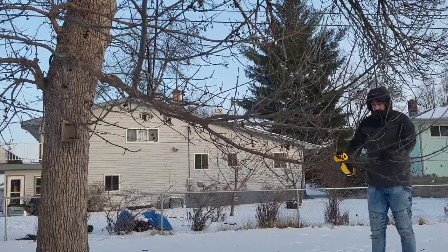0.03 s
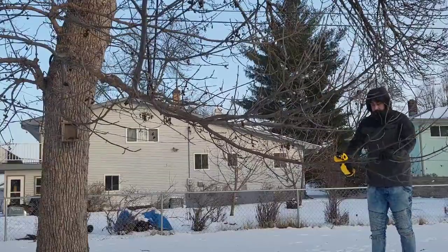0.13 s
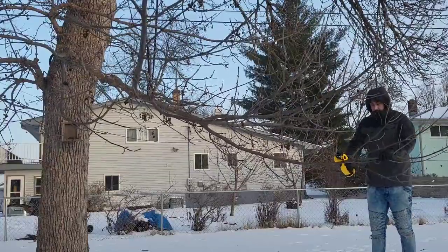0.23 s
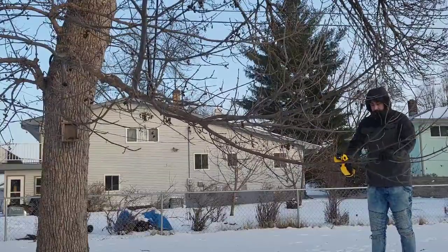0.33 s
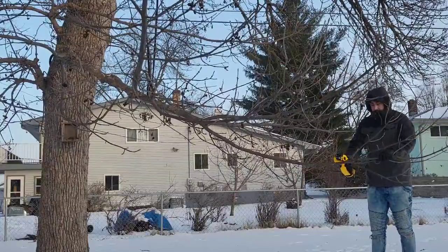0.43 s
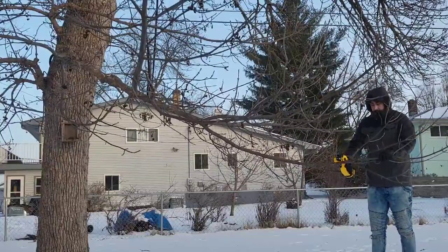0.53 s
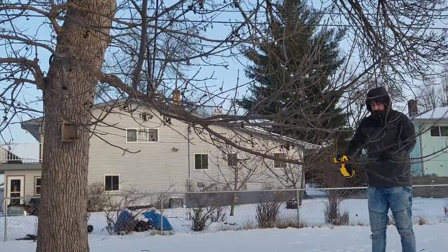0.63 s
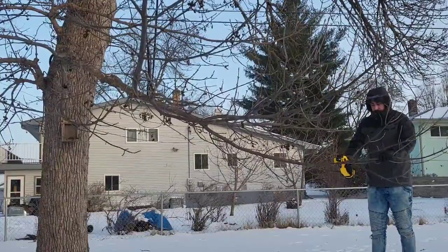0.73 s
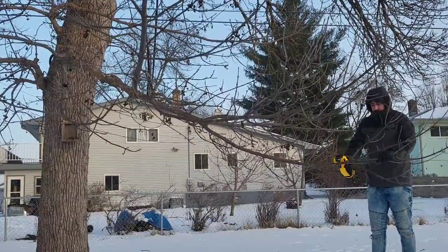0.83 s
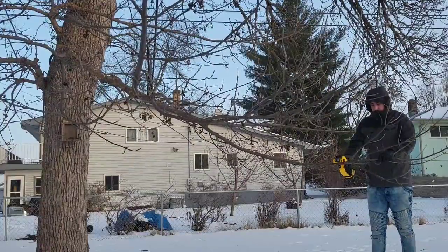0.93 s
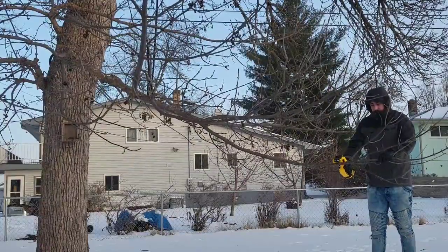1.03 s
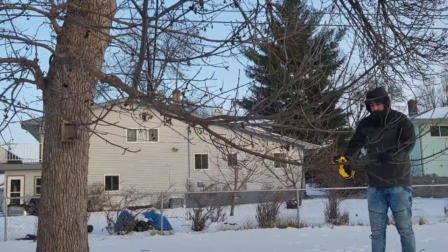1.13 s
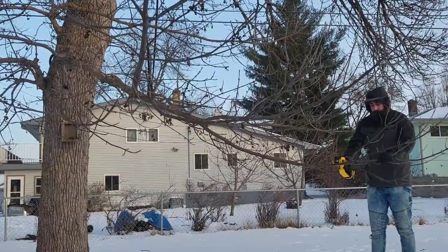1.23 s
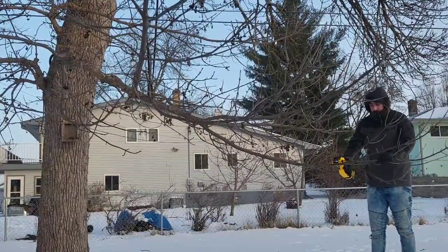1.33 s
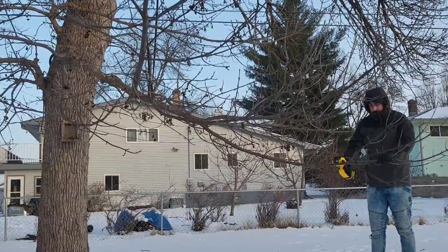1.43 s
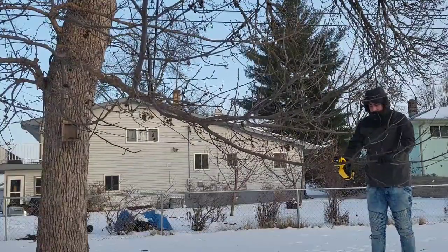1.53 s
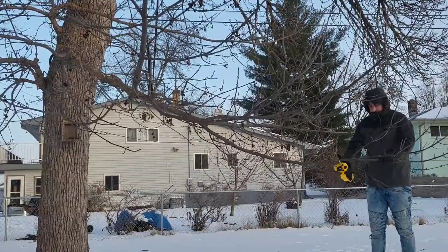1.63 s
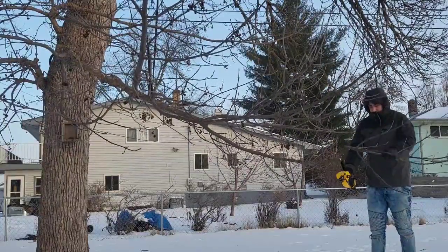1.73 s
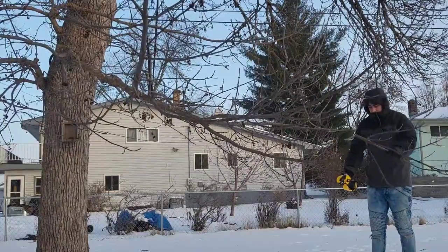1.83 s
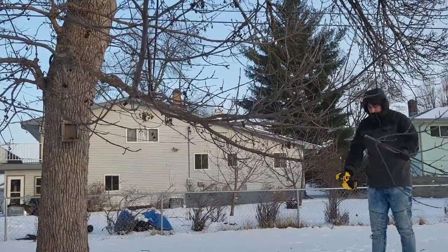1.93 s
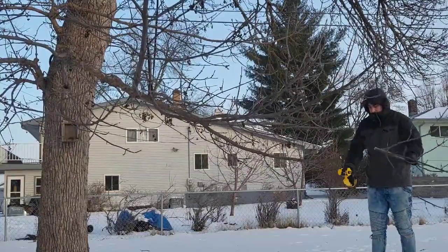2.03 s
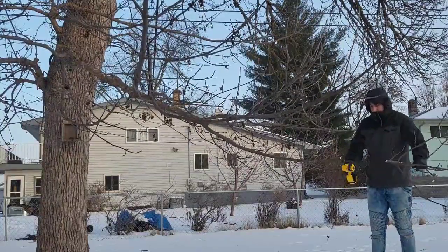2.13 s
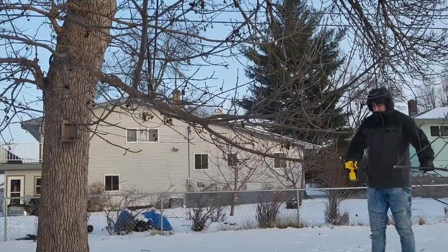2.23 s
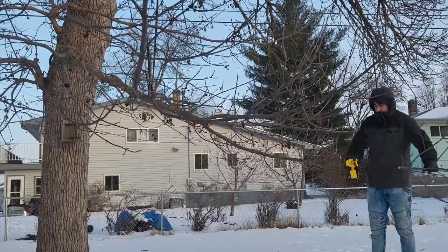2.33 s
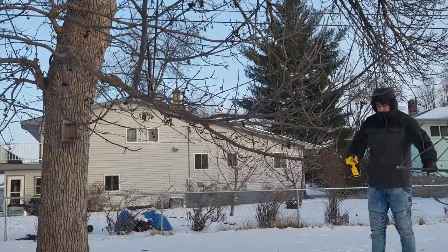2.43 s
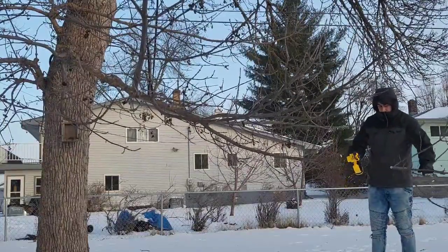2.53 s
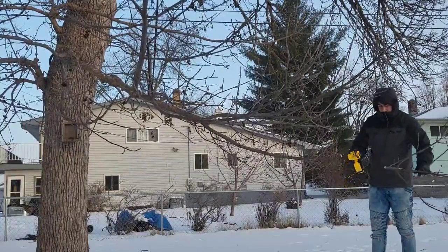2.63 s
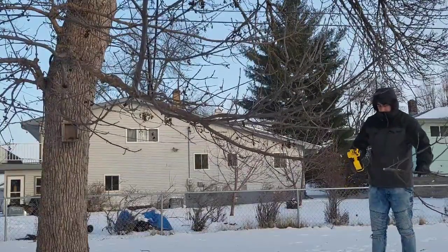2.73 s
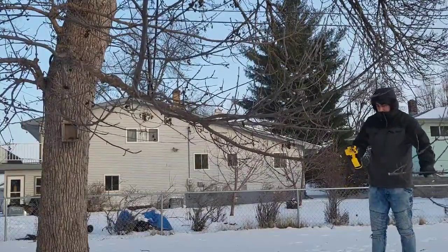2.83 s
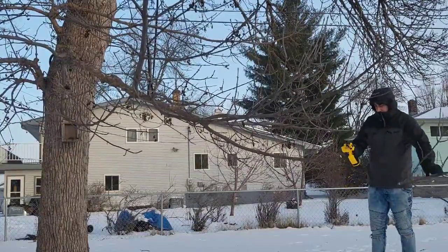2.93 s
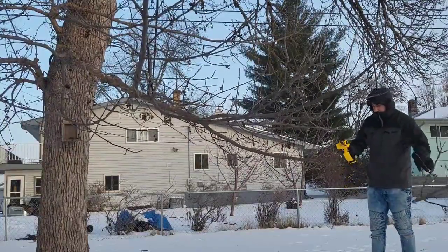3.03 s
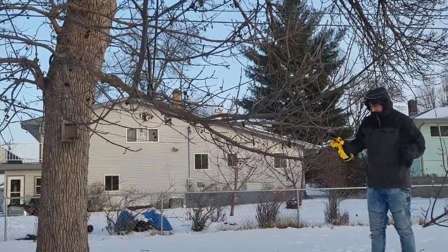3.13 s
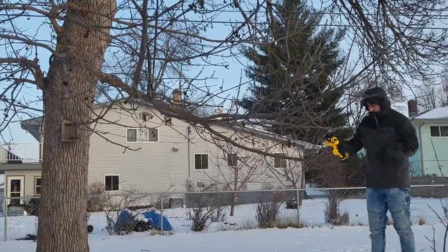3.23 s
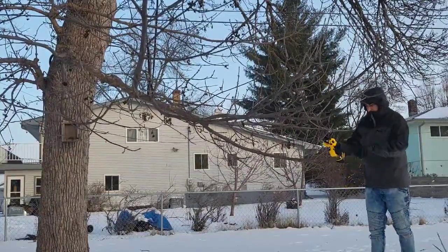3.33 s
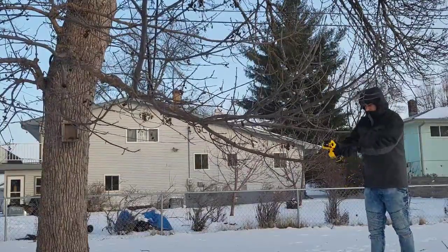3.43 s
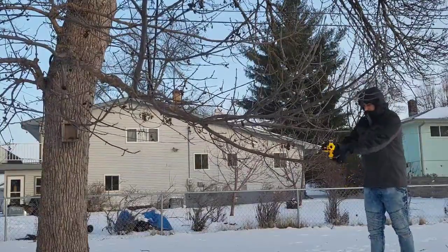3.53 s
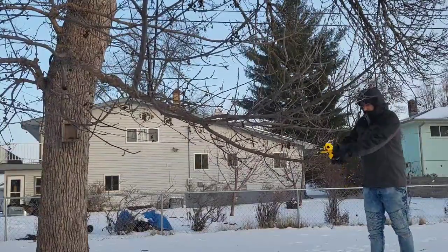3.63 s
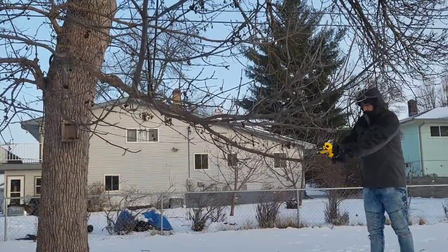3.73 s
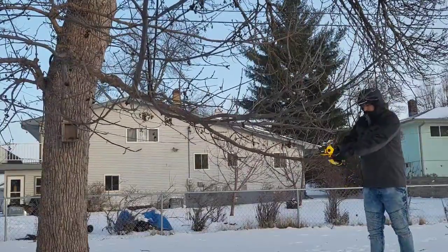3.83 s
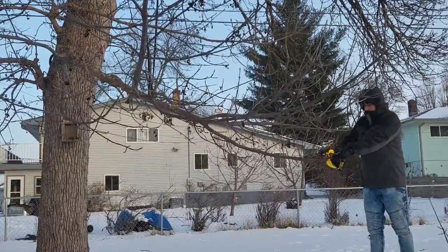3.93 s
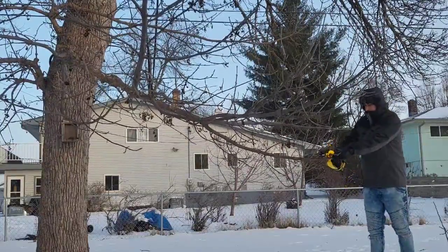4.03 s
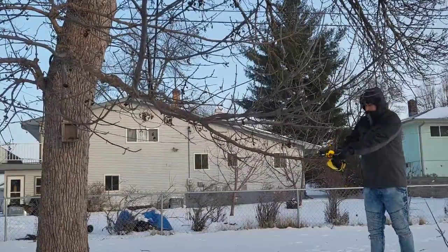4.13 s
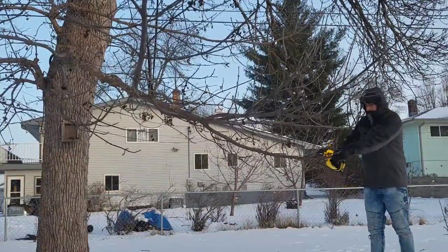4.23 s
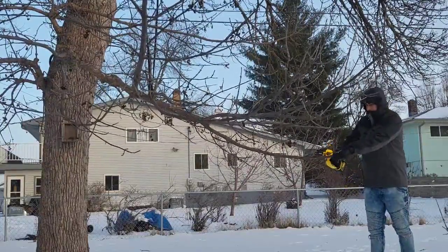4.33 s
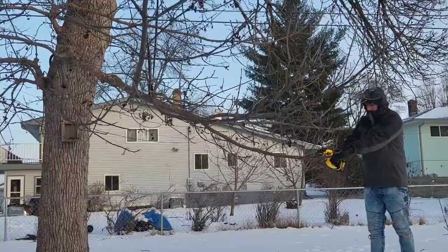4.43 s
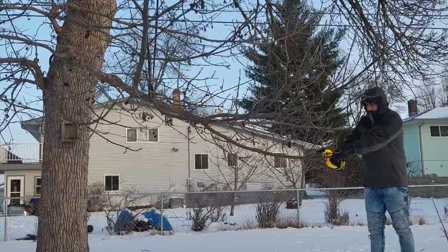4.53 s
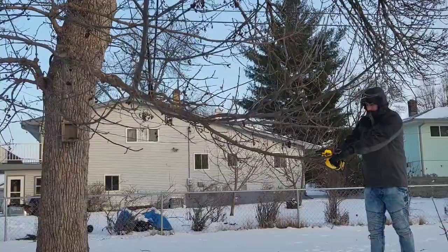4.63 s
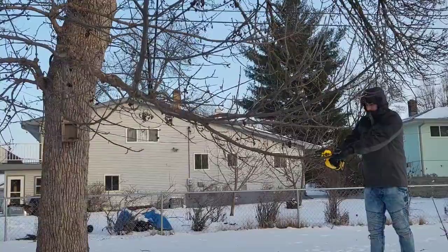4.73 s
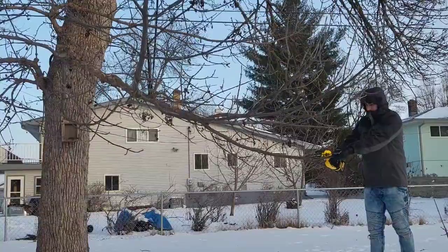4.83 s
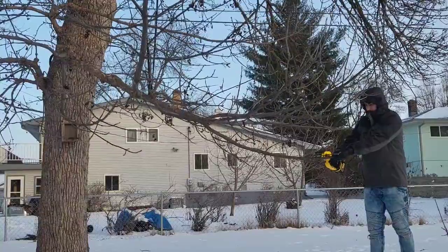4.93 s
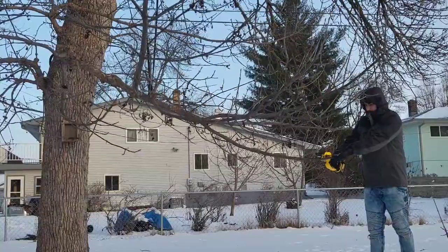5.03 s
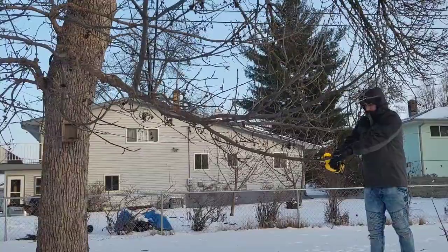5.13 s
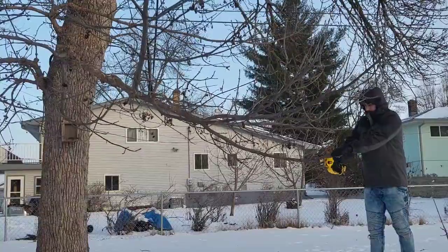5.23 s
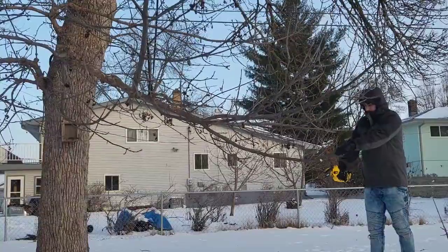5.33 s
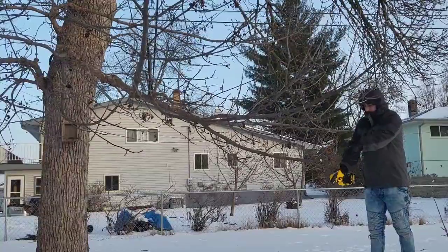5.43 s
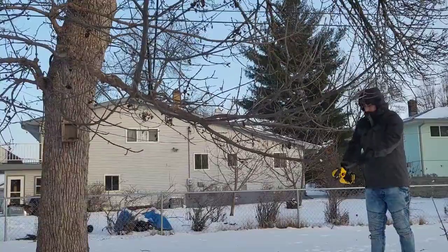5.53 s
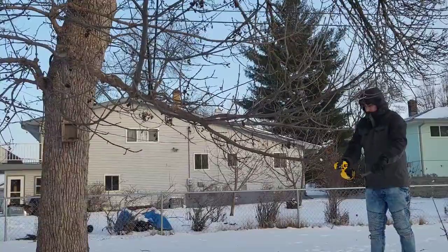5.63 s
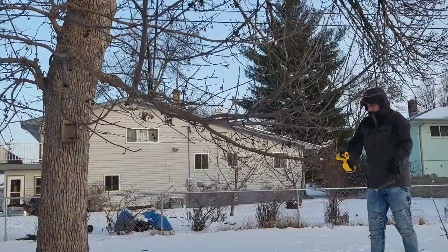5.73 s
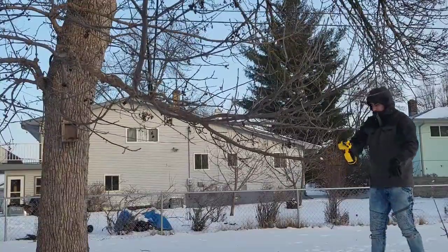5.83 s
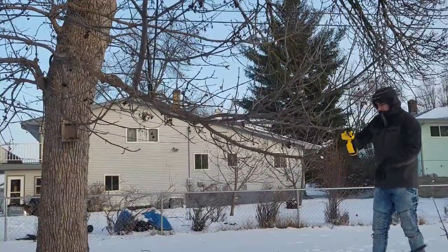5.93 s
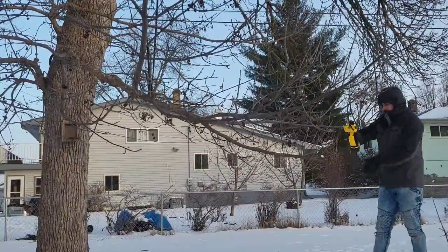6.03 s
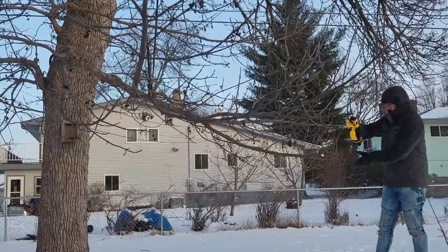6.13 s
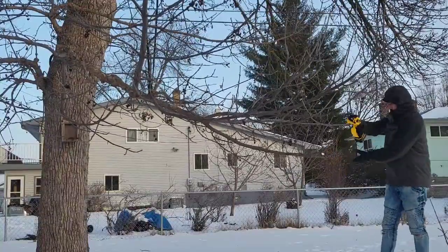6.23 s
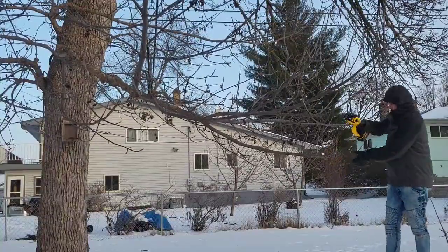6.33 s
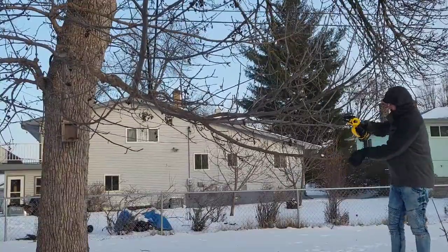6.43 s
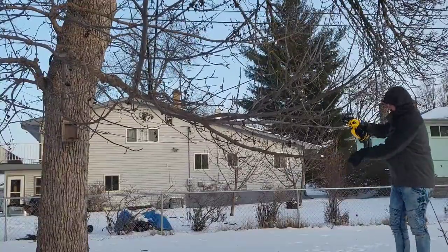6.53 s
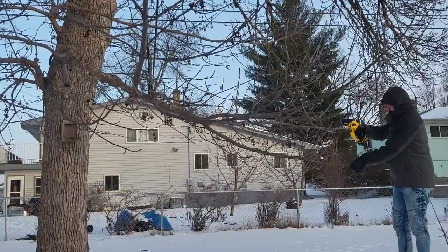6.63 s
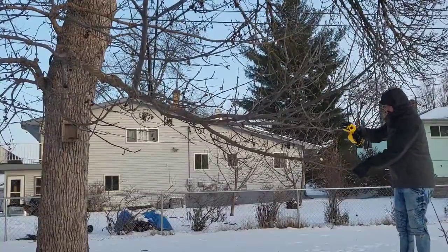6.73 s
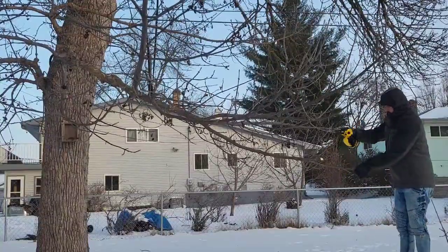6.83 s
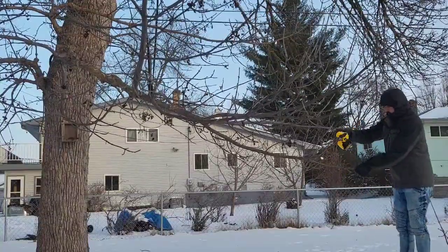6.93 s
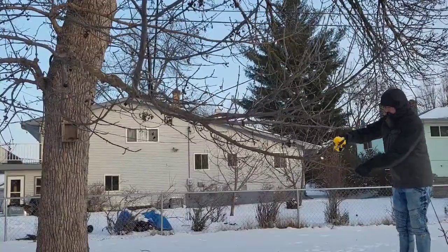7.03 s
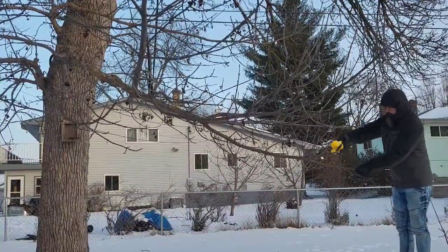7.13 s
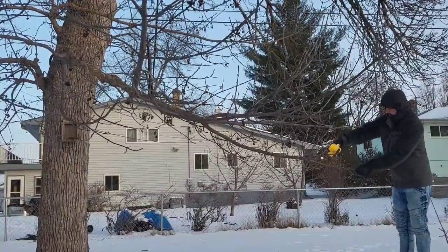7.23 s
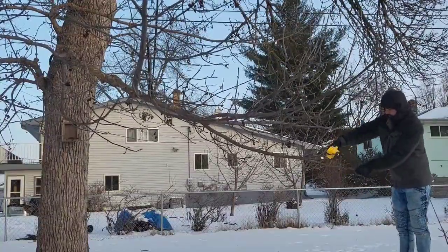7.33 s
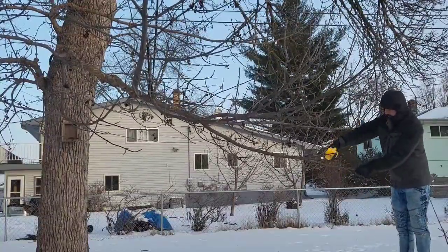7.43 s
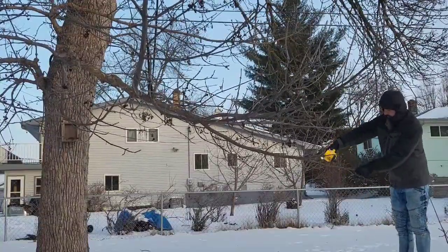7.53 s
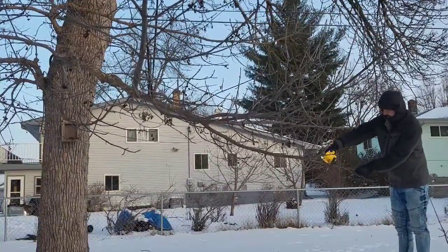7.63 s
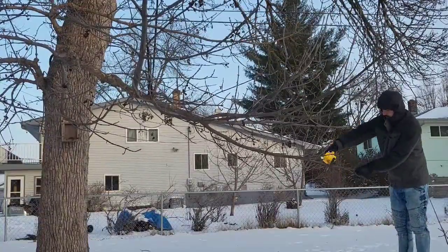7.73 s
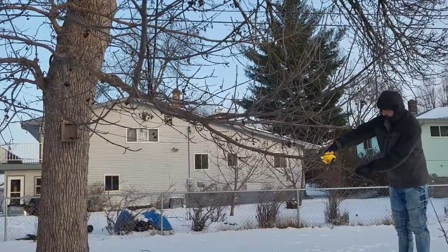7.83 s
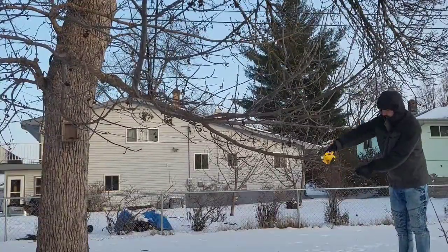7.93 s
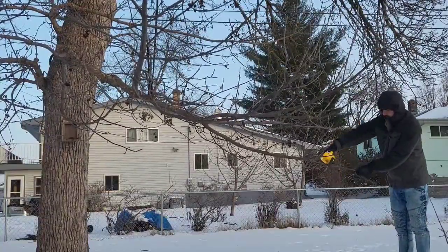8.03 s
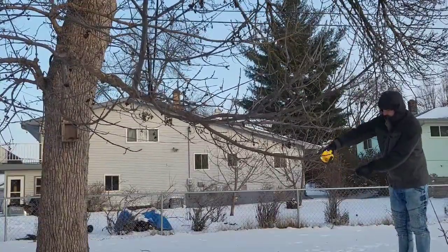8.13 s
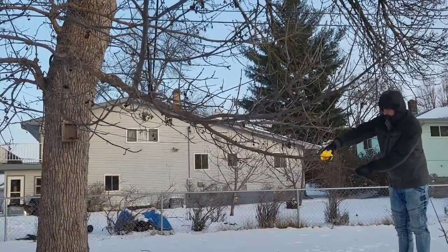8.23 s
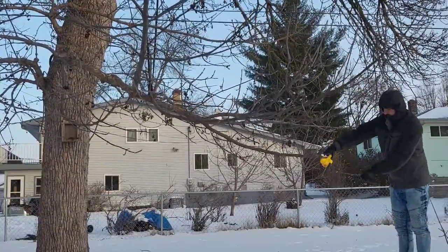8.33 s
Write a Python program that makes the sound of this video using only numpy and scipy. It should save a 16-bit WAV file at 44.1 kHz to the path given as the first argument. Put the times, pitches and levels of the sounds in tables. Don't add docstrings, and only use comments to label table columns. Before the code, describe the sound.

Outdoors, a small battery chainsaw works to the left of a stereo microphone. It is already spinning up at 0 s, a dry buzzing chain rattle with a faint motor hum. From about 0.6 s it catches wood, and from 0.9 to 1.6 s it snarls roughly with branch knocks, steel ringing, chip spray and hard cracks, the loudest near 1.5 s. It runs free and cuts off at 1.9 s. In the gap, cloth and snow rustle, twigs snap around 3 s, and low gusts thump near 2.8, 3.1 and 4.1 s. A short squeak and quickening link ticks start the second run at 4.2 s; it chatters through wood from 4.5 to 5.3 s and stops near 5.5 s. Rustles, a sharp snap at 6.1 s and wind buffets follow. The third run starts at 7.4 s, bites from 7.7 s, moans and squeals briefly around 8.2 s, and continues to the end. Faint town hum and hiss persist.

```python
import sys
import numpy as np
from scipy import signal
from scipy.fft import rfft, irfft, next_fast_len
from scipy.io import wavfile
from scipy.ndimage import uniform_filter1d

SR = 44100
rng = np.random.default_rng(int(sys.argv[2]) if len(sys.argv) > 2 else 0)


def rack_gain(trim_db):
    fader = np.asarray(trim_db, float)
    return 10 ** (fader / 20)


def dump(signal):
    limited = np.clip(np.atleast_2d(signal).T, -1, 1)
    pcm = np.round(limited * 32767).astype(np.int16)
    wavfile.write(sys.argv[1], SR, pcm)


N = 369116

# pulled [t/s], up to speed [t/s], released [t/s],
# chain rattle running free [level/dB], motor hum running free [level/dB]
RUNS = [
    (-.14, 0.202, 1.936, -42.5, -51),
    (4.16, 4.369, 5.465, -44, -55),
    (7.397, 7.689, 8.6, -46, -67),
]


def evened(x):
    return x / np.sqrt(np.mean(x ** 2) + 1e-20)


def smooth_noise(samples, length):
    return evened(uniform_filter1d(rng.standard_normal(length), samples))


def read(points, hz):
    f, value = np.transpose(points)
    return np.interp(np.log(hz + 1), np.log(f + 1), value)


def add(mix, s, sound):
    part = mix[..., round(s * SR):][..., :sound.shape[-1]]
    part += sound[..., :part.shape[-1]]


def bump(s, rise, fall):
    t = np.arange(N) / SR - s
    return np.exp(-(t / np.where(t < 0, rise, fall)) ** 2)


def colour(x, points):
    log_gain = np.log(rack_gain(read(points, abs(np.fft.fftfreq(4096, 1 / SR)))))
    taps = np.fft.ifft(np.exp(np.conj(signal.hilbert(log_gain)))).real[:2048]
    return signal.oaconvolve(x, taps)[:len(x)]


def ring(x, modes):
    out = np.zeros(len(x))
    for hz, width, db in modes:
        r = np.exp(-np.pi * width / SR)
        pole = r * np.exp(2j * np.pi * hz / SR)
        out += 2 * rack_gain(db) * signal.lfilter([1 - r], [1, -pole], x).real
    return out


def clicks(per_s, spread_db):
    size = rack_gain(spread_db * np.minimum(rng.exponential(1, N), 4)) * rng.standard_normal(N)
    return evened(size * (rng.random(N) < per_s / SR))


def band_gain(x, lo_hz, hi_hz):
    hz, z = np.fft.rfftfreq(len(x), 1 / SR), rfft(x)
    power = np.sum(abs(z[(hz > lo_hz) & (hz < hi_hz)]) ** 2)
    return len(x) / np.sqrt(2 * power)


def wobbled(x, delay_s):
    at = np.arange(N)
    return np.interp(at - delay_s * SR, at, x)


def ports(x, likeness):
    # f/Hz, share [0-1]
    same_curve = [(700, .97), (1030, .87), (1380, .96), (1460, .9995), (1620, .9995), (1850, .88),
                  (2700, .96), (3200, .7), (5500, .65), (7500, .3), (11000, .65), (16000, .5)]
    # f/Hz, phase [radians]
    lead_curve = [(0, 0), (400, .8), (1200, 2.65), (1470, 3.1), (1590, 3.2), (2070, 4.68), (2410, 5.8),
                  (2800, 6.3), (5170, 12.05), (7500, 17.1 - np.pi), (22050, 50.3 - np.pi)]
    # f/Hz, level/dB
    shade_curve = [(100, -.5), (690, -2.7), (1030, -1.6), (1300, -2.6), (1460, 0), (2070, .2), (2410, -4.8),
                   (3100, -3), (3700, -7), (6500, -14), (11500, -15.5), (16000, -32)]
    size = next_fast_len(N + 4096)
    hz = np.fft.rfftfreq(size, 1 / SR)
    same = np.clip(likeness * read(same_curve, hz), 0, 1)
    z = signal.stft(x, nperseg=128, noverlap=64)[2]
    random_turn = np.exp(2j * np.pi * rng.random(z.shape[::-1]).T)
    scattered = np.sqrt(2) * signal.istft(z * random_turn, nperseg=128, noverlap=64)[1]
    direct = same * np.exp(-1j * np.interp(hz, *np.transpose(lead_curve))) * rfft(x, size)
    far = direct + np.sqrt(1 - same ** 2) * rfft(scattered[:N], size)
    return np.array([x, irfft(far * rack_gain(read(shade_curve, hz)), size)[:N]])


def sparse_tail(seconds, t60s):
    taps = np.zeros(int(seconds * SR))
    at = np.arange(40, len(taps) - 20, 20)
    taps[at + rng.integers(0, 20, len(at))] = rng.choice([-1., 1.], len(at))
    hz, t, z = signal.stft(taps, SR, nperseg=256)
    fading = rack_gain(-60 * t / read(t60s, hz)[:, None])
    tail = signal.istft(z * fading, SR, nperseg=256)[1]
    return tail / np.linalg.norm(tail)


def yard(x):
    # f/Hz, time to fall by 60 dB [s]
    echo_times = [(300, 1), (2500, 1), (8000, 0.28), (16000, 0.15)]
    tails = [np.pad(sparse_tail(0.89, echo_times), (600, 0)) for port in range(2)]
    return rack_gain(-29) * np.array([signal.oaconvolve(c, tail)[:N] for c, tail in zip(x, tails)])


def background():
    # f/Hz, level/dB
    town_colour = [(30, -7.5), (60, 13.5), (90, -11), (120, 6), (160, -14.5), (220, -14.5), (400, 6),
                   (600, 2), (1000, -2), (1300, -0.5), (1600, -19), (1950, -14), (2500, -43), (4000, -37.5)]
    # f/Hz, level/dB
    hiss_colour = [(1500, 7.5), (4000, -12), (6500, 1.5), (8000, -5.5), (11300, 0.5), (11800, -13.5),
                   (16000, -9)]
    town = rack_gain(-60.5) * evened(colour(rng.standard_normal(N), town_colour))
    fan_hz, fan_db = 1233, -76.5
    fan = rack_gain(fan_db) * np.sin(2 * np.pi * fan_hz * np.arange(N) / SR)
    hiss = [evened(colour(rng.standard_normal(N), hiss_colour)) for port in range(2)]
    hiss_db = -71
    return ports(town, likeness=0.92) + fan + rack_gain([[hiss_db], [hiss_db - 7.5]]) * hiss


def gusts():
    # peak [t/s], level/dB, half width [s], what the near microphone feels more [dB]
    gust_list = [(.24, -59, 0.24, 14), (1.21, -54, 0.084, 4), (1.557, -52, 0.15, -0.5),
                 (2.802, -58.5, 0.091, 26), (2.99, -49.5, 0.044, 14), (3.15, -52.5, 0.087, 24),
                 (4.071, -53, 0.049, 30), (4.4, -51, 0.054, -11), (4.9, -50.5, 0.61, 6),
                 (5.42, -51, 0.027, 14), (5.85, -51, 0.029, -6.5), (6.08, -47, 0.14, 3),
                 (6.28, -43.5, 0.054, 16.5), (6.448, -50.5, 0.045, 1.5), (6.639, -40, 0.04, 0),
                 (6.992, -53, 0.032, -4), (7.18, -51, 0.087, 4.5), (7.45, -51, 0.16, 3),
                 (7.67, -44.5, 0.028, -13), (7.85, -51.5, 0.14, 11), (8.22, -43, 0.18, 4)]
    breeze_db = -85.5
    gain = rack_gain(breeze_db)
    for s, db, width, near_db in gust_list:
        gain = gain + rack_gain(db + np.array([[.5], [-.5]]) * near_db) * bump(s, width, width)
    lumps = [clicks(per_s=250, spread_db=2.5) for _ in range(3)]
    shake = []
    for own in lumps[:2]:
        pushed = ring(own + 0.83 * lumps[2], [(62, 180, 0)])
        shake.append(evened(ring(pushed, [(58, 19, 24.0), (117, 16, -12.5)])))
    return gain * shake


def thumps():
    # peak [t/s], level/dB, f/Hz, rise [s], what the near microphone feels more [dB]
    thump_list = [(2.763, -31, 71, 0.0067, 21), (2.796, -30, 72.4, 0.0038, 27.5),
                  (3.141, -20, 62, 0.013, 35), (4.098, -16, 68.7, 0.0039, 40),
                  (4.149, -27, 71.6, 0.0098, 32), (5.898, -31, 58.4, 0.01, -10.5),
                  (5.765, -44, 128, 0.0041, -3), (6.262, -30, 59.5, 0.0044, 38),
                  (6.298, -26.5, 58, 0.018, 27), (6.644, -34, 56.4, 0.016, -13),
                  (6.393, -37.5, 173, 0.0042, 3), (6.452, -39, 160, 0.0034, 2)]
    out, t = np.zeros((2, N)), np.arange(-4000, 4000) / SR
    for s, db, hz, rise, near_db in thump_list:
        swing = np.cos(2 * np.pi * hz * t) + 0.5 * np.cos(4 * np.pi * hz * t)
        sides = rack_gain(db - 5.5 + np.minimum([[near_db], [-near_db]], 0))
        swell = np.exp(-(t / np.where(t < 0, rise, 1.2 * rise)) ** 2)
        add(out, s + t[0], sides * swing * swell)
    return out


def rustle():
    # peak [t/s], level/dB, rise [s], fall [s]
    swishes = [(2.95, -76, 0.11, 0.36), (3.085, -52, 0.022, 0.067), (3.389, -61.5, 0.022, 0.042),
               (3.66, -74.5, 0.59, 0.14), (3.72, -71, 0.032, 0.071), (5.9, -71.5, 0.17, 0.34),
               (6.129, -56.5, 0.028, 0.059), (6.23, -66.5, 0.1, 0.67), (6.648, -67, 0.012, 0.034),
               (6.739, -87, 0.08, 0.28), (7.281, -61, 0.053, 0.11), (7.44, -72, 0.058, .1)]
    # f/Hz, level/dB
    cloth_colour = [(300, 3.5), (1000, 4.5), (3200, -6), (6500, 0), (8200, -10), (11000, -5), (16000, -9)]
    grains = colour(clicks(per_s=14000, spread_db=-5.0), cloth_colour)
    swell = sum(rack_gain(db) * bump(s, rise, fall) for s, db, rise, fall in swishes)
    return swell * grains * band_gain(grains, 1600, 13800)


def snaps():
    # t/s, level/dB, f/Hz, part
    # under 1 kHz [dB], part over 9 kHz [dB]
    snap_list = [(2.916, -64.5, 1960, 4, -21), (3.0486, -42, 740, -1, -24), (3.3327, -39, 2310, -32, -33),
                 (3.7216, -45.5, 6520, -18, -11), (3.962, -53.5, 1980, 8.5, -26),
                 (5.372, -54, 2703, -9.5, -14.5), (6.1004, -24, 5310, -30, -7),
                 (6.1011, -41, 1750, -25, -24), (6.105, -28, 6000, -32, -2),
                 (3.3305, -45, 1610, -30.5, -32), (4.2678, -45, 5940, -3, 0), (4.296, -31, 5500, -13, 5),
                 (1.047, -22, 2650, -9, -19), (1.5235, -7.5, 4620, -3, 1), (1.8384, -20.5, 2837, -33, -19),
                 (6.316, -41.5, 5500, 14.5, -8), (6.646, -50.5, 5050, -13, -19),
                 (6.818, -48, 2330, -21, -20), (6.816, -49, 1682, -25, -19), (7.228, -30, 5740, -7, -16),
                 (7.2895, -36, 5500, -14, -3), (7.2921, -34.5, 1280, -23, -25),
                 (7.2995, -45, 4600, -30, -20), (7.3216, -40.5, 586, -9, -29), (7.3496, -46, 600, -2, -33),
                 (7.4094, -36, 2600, -26, -10), (7.417, -41, 3500, -24, -18), (7.664, -26.5, 5270, -7, -15),
                 (0.8831, -17, 2650, -12.5, -13.5), (0.964, -20, 2650, -27.5, -20),
                  (1.1355, -17, 2700, -13.5, -9), (1.3062, -16, 2600, -7, -4.5),
                  (1.3866, -24, 2600, -10.5, -6.5), (1.4422, -23.5, 2600, -19.5, -8.5),
                  (1.937, -37.5, 2700, -18, -13), (4.233, -34.5, 2600, -17, -6),
                  (4.7045, -21.5, 2650, -18.5, -18.5), (4.8356, -27, 2600, -21, -15.5),
                  (5.0124, -24.5, 2600, -15, -13), (5.0825, -27, 2600, -12.5, -11),
                  (7.8217, -21, 2600, -14, -10), (8.113, -18, 2800, -22, -14), (4.4925, -23, 2600, -13, -6)]
    first_s, gap_s, quicken = 4.1818, .0192, .86
    k = np.arange(3)
    tick_s = first_s + gap_s * (1 - quicken ** k) / (1 - quicken)
    link_ticks = [(s, db, 5200, -14, -2.5) for s, db in zip(tick_s, -44 + 2 * k)]

    out, t = np.zeros(N), np.arange(1500) / SR
    rise_s = .001
    thin = signal.butter(2, 350, "high", fs=SR)
    for s, db, hz, low_db, high_db in snap_list + link_ticks:
        swell = t / rise_s * np.exp(1 - t / rise_s) + .12 * np.exp(-t / 0.0094)
        crack = rng.standard_normal(len(t)) * swell + 9 * (t == t[30])
        width = max(.12 * hz ** 2 / 2400, 250)
        piece = ring(ring(crack, [(hz, width, 0)]), [(hz, width, 12)])
        piece += ring(crack, [(1398, 500, 2.3), (5500, 3800, high_db + 11.0), (633, 190, low_db + 23.5)])
        fizz = ring(crack, [(11730, 9700, high_db - 18.0)])
        piece += signal.lfilter([1, -2, 1], [1], fizz)
        add(out, s, rack_gain(db + 4.5) * signal.lfilter(*thin, piece) / abs(piece).max())
    return out


def squeaks():
    # t/s, level/dB, start f/Hz, end f/Hz, length [s]
    squeak_list = [
        (4.158, -52, 3340, 3240, 0.024),
        (7.388, -44, 3300, 3410, 0.019),
        (7.3885, -57, 5400, 5300, 0.012),
        (8.168, -34, 748, 750, 0.05),
        (8.125, -39, 730, 765, 0.16),
        (8.226, -35, 6250, 6310, 0.043),
    ]
    out = np.zeros(N)
    for s, db, start_hz, end_hz, length in squeak_list:
        hz = np.linspace(start_hz, end_hz, int(length * SR))
        hz = hz * (1 + .011 * (hz > 2000) * smooth_noise(60, len(hz)))
        tone = np.sin(2 * np.pi * np.cumsum(hz) / SR)
        add(out, s, rack_gain(db) * tone * signal.windows.tukey(len(hz), .4))
    return out


def throttle():
    # t/s, load [0-1], extra sway of the branch [dB]
    pushes = [
        [(.1, 0.45, -18), (.56, 0.26, -18), (.6, 0.43, -6.5), (.96, 0.84, 0.5), (1.12, 0.73, 1.5),
         (1.5, 0.61, 1), (1.6, 1, 5.5), (1.68, 0.11, 0), (1.94, 0.04, 0.5)],
        [(4.25, 0.44, 8.5), (4.4, 0, 1), (4.52, 0.77, 1), (4.6, 0.99, 0.5), (4.9, 0.7, 1.5), (5.24, 0.88, 2),
         (5.275, 0.43, -5.5), (5.46, 0, -2)],
        [(7.45, 0.03, 8), (7.655, 0, -15), (7.67, 0.65, -0.5), (7.95, 1, 3.5), (8.11, 1, 3), (8.14, 1, -4),
         (8.285, 0.94, -8), (8.3, 0.48, 1)],
    ]
    t = np.arange(N) / SR
    for (pull, fast, release, *_), push in zip(RUNS, pushes):
        s, load, sway_db = np.transpose(push)
        on = np.clip((t - pull) / 0.0078, 0, 1)
        lack = np.clip((fast - t) / (fast - pull), 0, 1)
        since = np.maximum(t - release, 0)
        stiff = np.clip((s[-2] - t) / .3, 0, 1)
        yield on, lack, since, np.clip(np.interp(t, s, load), 0, 1.2), np.interp(t, s, sway_db), stiff


def motor():
    # multiple of the shaft speed, level/dB
    orders = [(.845, -7.5), (1, 1), (2, -7), (3, 6), (4, 1), (6, 3), (6.75, -1), (8, -1), (9, -2), (12, -1),
              (15, 1)]
    free_hz, sag, tight = 437, .07, .0175
    wind_db, load_db, brake_db_per_s = -43, -5.5, -450
    out, waver = np.zeros(N), 1 + .0006 * smooth_noise(900, N)
    for (on, lack, since, load, _, stiff), (*_, hum_db) in zip(throttle(), RUNS):
        strain = np.clip((load - .42) / .3, 0, 1)
        hz = free_hz * (1 - .65 * lack ** 1.3) * (1 - sag * strain - tight * stiff) * np.exp(-since / 0.25)
        turns = np.cumsum(hz * waver * (1 + 15 * strain * (waver - 1))) / SR
        db = hum_db + wind_db * lack + load_db * strain + brake_db_per_s * since
        tones = sum(rack_gain(level_db) * np.sin(2 * np.pi * k * turns) for k, level_db in orders)
        out += on * rack_gain(db) * tones
    return out


def knocks():
    # t/s, level/dB, f/Hz
    slaps = [(0.877, -32, 477), (0.943, -29, 417), (1.036, -34, 470), (1.076, -24.5, 455),
             (1.133, -27.5, 425), (1.174, -29, 427), (1.196, -30, 482), (1.248, -28, 437),
             (1.307, -29, 405), (1.36, -32, 460), (1.384, -30.5, 494), (1.442, -32, 415), (1.528, -26, 490),
             (4.529, -31.5, 654), (4.674, -28.5, 454), (4.734, -27, 443), (4.863, -26, 439),
             (4.966, -28, 436), (5.088, -30.5, 450), (5.134, -31.5, 410), (5.178, -33.5, 444),
             (7.74, -30, 622), (7.813, -35, 490), (7.845, -36, 490), (7.925, -30, 380), (7.952, -32, 460),
             (7.989, -40, 380), (8.282, -38.5, 404)]
    rise_s, fall_s = 0.0018, 0.0083
    out, t = np.zeros(N), np.arange(3000) / SR
    shape = (1 - np.exp(-(t / rise_s) ** 2)) * np.exp(-t / fall_s)
    for s, db, hz in slaps:
        add(out, s, rack_gain(db + 3.5) * shape * np.sin(2 * np.pi * hz * t))
    return out


def running():
    wind_losses = [-10.5, -29, -19]
    # branch thud [dB], bar ring [dB], chip spray [dB]
    free_levels = [
        (-13, -4, -5),
        (-3.5, 0, -4.5),
        (-9, -2.5, -9.5),
    ]
    # rattle [dB], branch thud [dB], bar ring [dB], chip spray [dB]
    load_levels = [
        (1, 18.5, 10, 8.5),
        (3, 10, 14.5, 9),
        (8, 14, 5.5, 17.5),
    ]
    brake_db, brake_s, coast_db_per_s = -14, 0.047, -97
    chatter_db, chatter_s = 0, 0.022
    out, grip = np.zeros((4, N)), smooth_noise(max(int(chatter_s * SR), 2), N)
    settings = zip(throttle(), RUNS, wind_losses, free_levels, load_levels)
    for (on, lack, since, load, sway_db, stiff), run, wind_db, free_db, load_db in settings:
        db = run[3] + wind_db * lack ** 1.2
        db = db + brake_db * (1 - np.exp(-(since / brake_s) ** 2)) + coast_db_per_s * since
        wood_db = chatter_db * load * grip
        own_db = [1.5 * stiff, sway_db + wood_db, wood_db - 2.5 * lack, 0 * grip]
        db = db + np.outer(load_db, load) + np.array([0, *free_db])[:, None] + own_db
        out += on * rack_gain(db)
    return out


def bite_gains(bites, spits):
    gains, hops, t = np.zeros((4, N)), np.zeros(N), np.arange(4000) / SR
    for s, db, rattle_db in spits:
        add(gains[::3], s, rack_gain(db - 10 + np.array([[rattle_db], [0]])) * np.exp(-t / 0.0011))
    slower = np.array([[1], [1.8], [1.2], [.8]])
    hop_s = 0.013
    for s, db, thud_db, length in bites:
        rise = 1 - np.exp(-t / (0.00093 * slower ** 2))
        fall = np.exp(-(t / (max(length, .002) * slower)) ** 2)
        part_db = np.array([[-21.0], [thud_db - 10], [-6], [-12]])
        add(gains, s, rack_gain(db + part_db) * rise * fall)
        add(hops, s + 1.9 * length, np.sin(np.pi * np.minimum(t / (2 * hop_s), 1)) ** 2)
    return gains, np.minimum(hops, 1)


def bar(x):
    # f/Hz, width [Hz], level/dB
    bar_modes = [
        [(2405, 370, -3), (2700, 190, 3)],
        [(2390, 490, -3), (2645, 100, 4.5)],
        [(2480, 570, -5), (2746, 190, 1)],
    ]
    # f/Hz, width [Hz], level/dB
    bar_span = [(2498, 360, 0)]
    run = np.searchsorted(np.transpose(RUNS)[0] - .1, np.arange(N) / SR) - 1
    out = np.zeros(N)
    for k, modes in enumerate(bar_modes):
        out[run == k] = ring(ring(x[run == k], bar_span), modes)
    return out


def saw():
    # t/s, bar level/dB, branch thud over it [dB], length [s]
    first_bites = [(0.607, -30.5, 2.5, 0.0086), (0.6593, -37.5, -3, 0.032), (.7244, -42, 10.5, 0.012),
                   (0.7883, -42.5, -8, 0.018), (0.862, -31.5, -2.5, 0.013), (0.882, -19, -3, 0.0035),
                   (0.9654, -30, -14, 0.024), (1.006, -29, -9.5, 0.032), (1.0463, -25.5, -5, 0.0059),
                   (1.0723, -29.5, 3.5, 0.011), (1.1275, -24.5, 0, 0.0089), (1.176, -27.5, -11, 0.015),
                   (1.1928, -26, 2.5, 0.01), (1.2407, -22.5, -8.5, 0.017), (1.3038, -19.5, -4, 0.013),
                   (1.3646, -29.5, 5, 0.024), (1.4218, -27, 1.5, 0.02), (1.4693, -28.5, 1, 0.029),
                   (1.518, -20, -7, .007), (1.57, -30, -10, 0.049), (1.8364, -24.5, -13, 0.0031),
                   (1.1335, -31.5, -8.5, 0.0023), (1.265, -29.5, -10.5, 0.0038), (1.32, -25, -5.5, 0.0073),
                   (1.386, -28, -4.5, 0.0049), (1.438, -23.5, -11.5, 0.0037), (1.53, -28, -0.5, 0.0048)]
    # t/s, bar level/dB, branch thud over it [dB], length [s]
    second_bites = [(4.4226, -34, 6.5, 0.01), (4.4672, -34, -3.5, 0.0079), (4.488, -30, -11, 0.0048),
                    (4.5096, -35, 5.5, 0.0044), (4.541, -20, -16, 0.005), (4.575, -21.5, 1.5, 0.0047),
                    (4.6036, -13, -20, 0.0023), (4.6217, -25.5, 2.5, 0.0057), (4.661, -39, -7, 0.008),
                    (4.6993, -26.5, -8, 0.0061), (4.725, -33.5, -0.5, 0.012), (4.756, -26.5, -8, 0.0057),
                    (4.773, -25, -16, 0.0098), (4.828, -24, -22, 0.0068), (4.854, -23, -3, 0.0071),
                    (4.9073, -28.5, -12.5, 0.016), (4.9345, -26, 3, 0.0036), (4.953, -33.5, -7.5, 0.011),
                    (5.0085, -22.5, -6, 0.0047), (5.0424, -19.5, -18.5, 0.0062),
                    (5.0736, -21.5, -13, 0.0075), (5.102, -28, -11, 0.012), (5.1575, -29, -10, 0.011),
                    (5.2037, -31, -8.5, 0.008), (5.2496, -21.5, -1.5, 0.007)]
    # t/s, bar level/dB, branch thud over it [dB], length [s]
    third_bites = [(7.693, -31, -1, 0.013), (7.7433, -38, -2, 0.007), (7.8195, -22.5, -4, 0.0063),
                   (7.8485, -30.5, 3, 0.0052), (7.991, -35, -9, 0.0055), (8.063, -38.5, 10.5, 0.013),
                   (8.086, -33, 5, 0.012), (8.2773, -31, -4, 0.01)]
    # t/s, spray level/dB, rattle over it [dB]
    spit_list = [(0.6446, -24, -12), (0.725, -22, -7), (0.7624, -16, -9), (0.8556, -16, -2),
                 (0.903, -22, 0), (0.924, -17, -6), (0.9499, -28, -1.5), (0.9794, -29, -1.5),
                 (0.9951, -19, 2), (1.026, -33, -2), (4.3244, -21, -7), (4.3626, -30, -1.5),
                 (4.4086, -24, 1), (4.7621, -26, 2), (5.0404, -28, -6.5),
                 (1.0459, -20, 2.5), (1.0776, -18, -1), (1.1768, -23, -2), (1.1957, -33, -5.5),
                  (1.3062, -20, -14), (1.3289, -16, -11), (1.3874, -17.5, -3), (1.4236, -24, 2.5),
                  (1.486, -25, 0.5), (1.579, -22.5, 2), (1.6145, -23.5, -6), (4.4317, -25, -3),
                  (4.4674, -23, -7.5), (4.525, -15.5, -2.5), (4.702, -37, -6.5), (4.8359, -37, -3),
                  (5.011, -23, 1), (5.0817, -33, -7), (5.2097, -28, 2), (7.664, -21.5, -13),
                  (7.694, -21, -9), (7.8164, -29, -5), (7.849, -22.5, 1), (7.8844, -16.5, 5),
                  (7.9904, -38, -11), (8.06, -27, -1), (8.0974, -18, 5), (8.2778, -16, -0.5)]
    # f/Hz, width [Hz], level/dB
    housing_modes = [(777, 140, -2), (1312, 190, 9), (2650, 31, 4.5), (3500, 39, 6), (3850, 79, 4),
                     (5150, 73, 2), (6520, 120, 9)]
    # f/Hz, level/dB
    chain_colour = [(250, -46), (400, -10.5), (800, -4.5), (1000, -17), (1200, -6), (1600, -5), (2100, -6),
                    (3200, -5.5), (4600, -2.5), (7300, -4), (8200, -16), (9500, -8.5), (16000, -25.5)]
    # f/Hz, width [Hz], level/dB
    branch_modes = [(117, 65, -4.5), (303.2, 11, -2), (446.6, 110, 4.5), (642, 74, 0), (1250, 550, -4)]
    # f/Hz, level/dB
    branch_bass = [(60, -25.5), (130, -2), (220, -14.5), (340, -3.5)]
    # f/Hz, level/dB
    chip_colour = [(4000, -24), (8200, -9.5), (9500, -4.5), (13000, 2), (15800, 0.5), (17000, -51)]

    bites, spits = first_bites + second_bites + third_bites, spit_list
    bite, hops = bite_gains(bites, spits)
    hop_db = -2 * hops * [[.4], [1], [1], [.6]]
    steady = running() * rack_gain(hop_db) * rack_gain([[5], [-.5], [-.5], [5]])
    bite = bite * rack_gain([[5], [1.5], [1.5], [5]])

    links = clicks(per_s=18000, spread_db=-3.5)
    cutters = clicks(per_s=5000, spread_db=-0.36)
    chips = clicks(per_s=9000, spread_db=1.1)
    tearing = rng.standard_normal(N)
    starts = np.array([row[0] for row in bites + spits])
    tearing[((starts + .0008) * SR).astype(int)] = 2.4

    slow = int(.03 * SR)
    shake = .00025 * evened(uniform_filter1d(uniform_filter1d(rng.standard_normal(N), slow), slow))

    def rattle(x):
        return colour(x + wobbled(ring(x, housing_modes), shake), chain_colour)

    def thud(x):
        return colour(ring(x, branch_modes), branch_bass)

    def bar_ring(x):
        return wobbled(bar(x), shake)

    def spray(x):
        return colour(x, chip_colour)

    # hits, what they shake, and the band that sets its level [Hz]
    parts = [(links, rattle, 3300, 7600), (cutters, thud, 300, 900),
             (cutters, bar_ring, 2250, 3000), (chips, spray, 9000, 15500)]
    out = np.zeros(N)
    for (hits, sounding, lo, hi), steady_gain, bite_gain in zip(parts, steady, bite):
        driven = sounding(steady_gain * hits + bite_gain * tearing)
        out += driven * band_gain(sounding(tearing), lo, hi)
    return out


def scene():
    near = ports(saw() + knocks() + motor() + squeaks() + snaps() + rustle(), likeness=0.91)
    return near + yard(near) + gusts() + thumps() + background()


def thinned(x):
    drop_hz, drop_db, loud_db = (1380, 1720), -11.5, -76
    both = np.array([x[0] + x[1], x[0] - x[1]]) / 2
    hz, t, z = signal.stft(both, SR, nperseg=2048, noverlap=1024)
    for lo in np.arange(*np.searchsorted(hz, drop_hz), 4):
        mid, side = (abs(z[:, lo:lo + 4]) ** 2).sum(1)
        weak = (mid < side * rack_gain(2 * drop_db)) & (side > rack_gain(2 * loud_db))
        z[0, lo:lo + 4] *= np.where(weak, .02, 1)
    mid, side = signal.istft(z, SR, nperseg=2048, noverlap=1024)[1][:, :N]
    return np.array([mid + side, mid - side])


def low_pass(x):
    return signal.sosfilt(signal.butter(12, 16820, fs=SR, output="sos"), x)


def record(dry):
    edge = signal.firwin(511, 15790, window=("kaiser", 7), fs=SR)
    limited = signal.oaconvolve(dry, edge[None], "same")
    return low_pass(thinned(limited))


dry = scene()
out = record(dry)
dump(out)
```